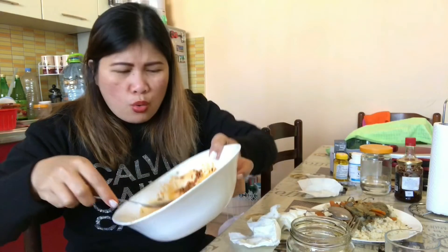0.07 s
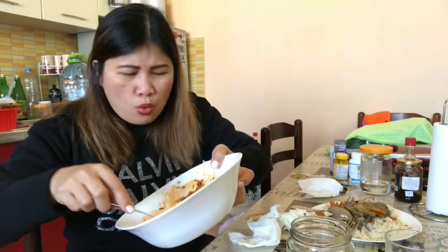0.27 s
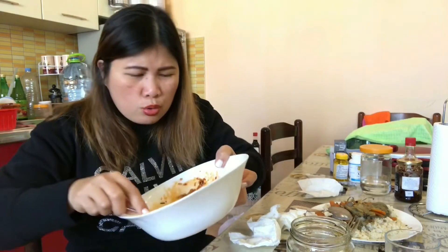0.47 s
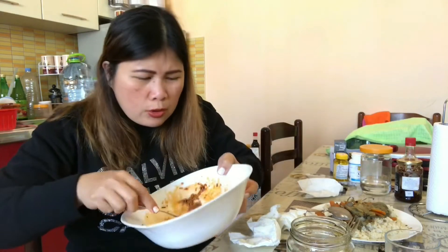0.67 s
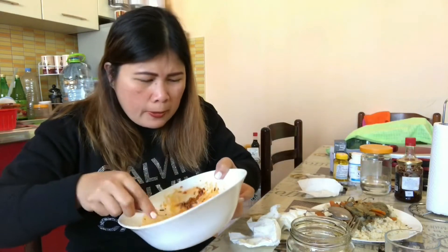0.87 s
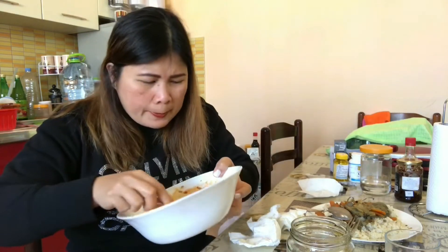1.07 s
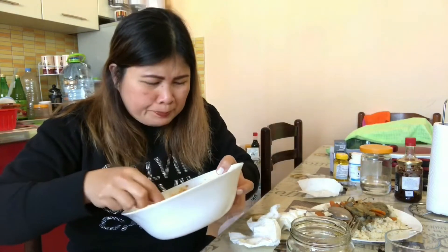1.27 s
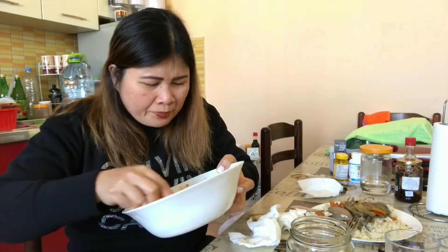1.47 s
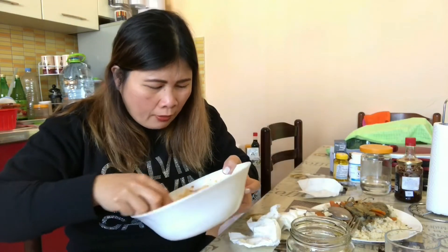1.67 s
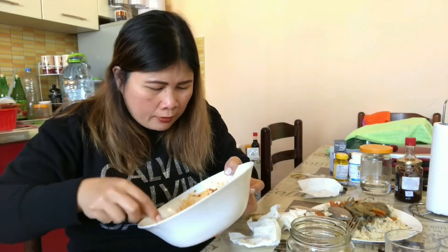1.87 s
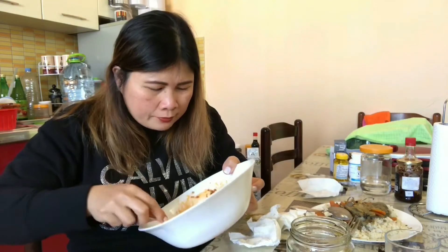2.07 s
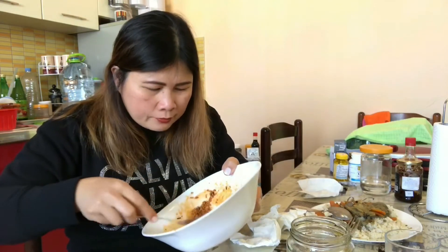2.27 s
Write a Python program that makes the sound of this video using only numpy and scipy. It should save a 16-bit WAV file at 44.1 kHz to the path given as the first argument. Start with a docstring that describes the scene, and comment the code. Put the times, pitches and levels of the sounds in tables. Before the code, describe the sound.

A metal fork lightly taps and scrapes a ceramic bowl through the first second, over a faint, low appliance hum. Around 1 second the bowl bumps the table with a soft swish and a ringing clink. Faint, squeaky scrapes follow until 1.4 seconds. After a lull, the fork strikes the rim loudly at about 2.1 seconds, bounces, and taps once more softly, ringing briefly in the small kitchen.

```python
"""Over a low appliance hum, a metal fork lightly taps and scrapes a hand-held ceramic bowl.
Each tap clicks and sets bowl and fork ringing; in a scrape the tines stick and slip, rasp and squeak.
The bowl bumps the table with a soft swish, then the fork strikes the rim hard and bounces.
The bare walls of the small kitchen make these sounds ring on."""
import sys
import numpy as np
from scipy import signal
from scipy.fft import rfft, irfft, next_fast_len
from scipy.io import wavfile
from scipy.ndimage import uniform_filter1d

SR = 44100
rng = np.random.default_rng(int(sys.argv[2]) if len(sys.argv) > 2 else 0)


def dump_mix(stems):
    """Bounce the given channels to the path in sys.argv[1] as a 16-bit WAV at rate SR."""
    frames = np.atleast_2d(stems).T  # one column per channel
    limited = np.clip(frames, -1, 1)  # hard clip at full scale
    pcm = np.round(limited * 32767).astype(np.int16)
    wavfile.write(sys.argv[1], SR, pcm)


N = 102576

# tones of the appliance hum: pitch_hz, level_db
HUM_TONES = [(48, -65.5), (86, -74), (171.5, -62), (256, -63.5), (290, -70), (382, -72), (559.5, -66.5)]
# tone colour (how strong each pitch is next to the others) of the room air: pitch_hz, level_db
AIR_COLOUR = [(35, -38), (60, -12.5), (94, -7.5), (118, -13), (156, -5), (193, -6), (256, -3.5), (408, -8),
              (553, -9.5), (593, -15.5), (991, -12), (6000, -37), (16000, -46)]
# the tones the bowl rings with: pitch_hz
BOWL_PITCHES = [603, 810, 1202, 1925, 2005, 2930, 4968, 5266, 5897, 6042, 6529, 7412, 7860, 8630, 9812,
                11490, 13405]
# the same tones in order, and their time to fade by 60 dB: ring_s, rim_level_db, inside_level_db
BOWL_TONES = [(0.29, -33, -33.5), (0.028, -30.5, -17), (0.061, -9, -34), (0.072, -14.5, -39),
              (0.17, -16.5, -15.5), (0.13, -5, -4), (0.034, -22, -15.5), (0.032, -2.5, -11),
              (0.086, -10, -10.5), (0.32, -17, -28), (0.059, 3.5, -45), (0.039, -10.5, -55),
              (0.086, -10, -22), (0.059, -11.5, -41), (0.057, -11.5, -45), (0.037, -28, -32),
              (0.053, -23, -41)]
# the tones the fork rings with: pitch_hz, ring_s, level_db
FORK_TONES = [(2290, 0.021, -0.5), (4650, 0.023, -11.5), (6960, 0.089, -4), (7355, 0.049, -1.5),
              (8040, .04, -11), (8760, 0.026, -13.5)]
# fork taps on the bowl: start_s, bowl_db, fork_db, click_db, place (0 inside, 1 rim),
# brightness_db_per_octave, damping_db_per_s (extra fading as the fork rests on the bowl)
TAPS = [(0.0694, -42, -46.5, -42, 0.3, 2.7, 16), (0.2226, -52.5, -58, -50, 0.52, 8.5, 100),
        (0.257, -45, -67, -60, 0.16, -3, 513), (0.8024, -37, -47.5, -36, 0.17, -1, 202),
        (0.848, -46, -73, -58, 0.089, -3, 30), (1.0773, -26, -29, -38, 0.25, -3, 1),
        (1.7744, -71, -76, -63, .3, 12, 100), (1.797, -66, -70, -55, 0.88, 4, 97),
        (2.065, -52.5, -64, -63, 1, 1, 398), (2.0865, -8.5, -25.5, -6, 0.94, 1, 24),
        (2.1612, -15.5, -32, -20.5, 0, 1, 400), (2.298, -40.5, -52, -42, .3, -4.5, 100)]
# tone colour of a tap's click: pitch_hz, level_db
CLICK_COLOUR = [(150, -43), (480, -21), (800, -12), (1050, -15), (1330, 11.5), (1750, -7), (2550, -9),
                (3500, 5.5), (4200, -1.5), (5400, 0), (6800, 0), (8000, -12), (8800, -8), (10300, -17),
                (11500, -12), (13500, -20.5), (16000, -17)]
# fork scrapes: start_s, length_s, rasp_db, bowl_db, squeak_db, fork_db, slips_per_s,
# damping_db_per_s, brightness_db_per_octave
SCRAPE_STROKES = [(.254, 0.049, -61.5, -53.5, -72, -71, 1420, 3000, 10),
                  (0.431, 0.089, -73, -84, -88, -77, 2300, 300, 2),
                  (0.632, 0.054, -56, -56.5, -51.5, -59.5, 1800, 400, 2),
                  (0.81, 0.07, -62.5, -60, -57, -72, 1200, 92, 2),
                  (1.15, 0.125, -60, -63, -59.5, -63, 1200, 100, 0.5),
                  (1.208, 0.061, -50.5, -53, -50, -61, 990, 300, -1),
                  (1.307, 0.071, -55.5, -53, -56.5, -70, 2040, 103, -3),
                  (1.354, 0.037, -53.5, -63, -43, -58.5, 3000, 202, -2.5),
                  (1.595, 0.094, -85, -76, -80, -85, 1800, 104, 0)]
# tone colour of a scrape's rasp: pitch_hz, level_db
RASP_COLOUR = [(600, -18), (1500, 1.5), (1850, -22), (2300, -6), (3400, 5.5), (4000, 5), (5000, 6),
               (6300, -3), (7500, 2), (9500, -12), (11700, -9.5), (13000, -15), (14500, -8), (16000, -25)]
# soft bumps of the bowl on the table: start_s, level_db
TABLE_BUMPS = [(0.862, -45.5), (0.886, -52), (1.0102, -35), (1.022, -44), (1.031, -43.5), (1.078, -41.5)]
# the tones the table rings with: pitch_hz, ring_s, level_db
TABLE_TONES = [(355, 0.027, 1), (1050, 0.04, -8)]
# tone colour of a bump's thud: pitch_hz, level_db
THUD_COLOUR = [(80, -20), (220, -2), (370, 1.5), (680, -10), (1100, 5.5), (1500, -5.5), (2200, -23),
               (6000, -21), (14000, -30)]
# tone colour of the swish: pitch_hz, level_db
SWISH_COLOUR = [(1500, -21), (3000, -5), (4500, -5), (5800, 0), (6800, -3), (8200, -17), (11000, -11.5),
                (13500, -12), (16000, -14)]
# rise and fall of the swish: time_s, level_db
SWISH_SWELL = [(.88, -85), (0.951, -66), (1.006, -51.5), (1.061, -54.5), (1.09, -45), (1.125, -91)]
# single echoes from table and walls: delay_s, level_db
EARLY_ECHOES = [(.0031, -25), (0.0214, -14.5), (.051, -24.5)]
# ringing of the kitchen, from low bands to high: pitch_hz, ring_s, level_db
ROOM_BANDS = [(300, 0.31, -9.5), (1020, 0.32, -9), (2320, 0.45, -6), (5840, 0.49, -9), (11900, 0.37, -11)]

EVENT_SAMPLES = 20480  # room for one tap, scrape or bump


def undb(db):
    """Turn decibels into a volume factor."""
    return 10 ** (np.asarray(db) / 20)


def unit(x):
    """Scale a sound to an average strength (rms) of 1."""
    return x / np.sqrt(np.mean(x ** 2))


def clock(size=EVENT_SAMPLES):
    """The time of each sample in seconds."""
    return np.arange(size) / SR


def fade(ring_s):
    """Die away by 60 dB in ring_s."""
    return np.exp(-np.log(1000) * clock() / ring_s)


def log_hz(size=EVENT_SAMPLES):
    """The pitches of a spectrum on a log scale."""
    return np.log(np.maximum(np.arange(size // 2 + 1) * SR / size, 1))


def colour(x, points):
    """Give a sound a tone colour and a strength of 1."""
    hz, db = np.array(points).T
    gain = undb(np.interp(log_hz(len(x)), np.log(hz), db))
    return unit(irfft(rfft(x) * gain, len(x)))


def noise(points, size=EVENT_SAMPLES):
    """Hiss with a tone colour."""
    return colour(rng.standard_normal(next_fast_len(size)), points)[:size]


def tilt(points, bright_db):
    """Brighten a tone colour by bright_db per octave."""
    return [(hz, db + bright_db * np.log2(hz)) for hz, db in points]


def convolve(x, response):
    """Let every sample of x set off the response."""
    return signal.fftconvolve(x, response)[:len(x)]


def delay(x, start_s):
    """Place a sound in the scene."""
    return np.pad(x, (max(int(start_s * SR), 0), N))[:N]


def drift(rate_hz, size=EVENT_SAMPLES):
    """A smooth random wobble of strength 1."""
    hold = int(SR / rate_hz)
    steps = np.repeat(rng.standard_normal(size // hold + 1), hold)
    return unit(uniform_filter1d(steps, hold)[:size])


def hum_and_air(waver=0.2, air_db=-54.5):
    """An appliance hums, wavering a little, over steady room air."""
    hum = 0
    for hz, db in HUM_TONES:
        level = undb(db) * np.sqrt(2) * (1 + waver * drift(5.74, N))
        hum += level * np.sin(2 * np.pi * hz * clock(N) + waver * drift(4.63, N))
    return hum + undb(air_db) * noise(AIR_COLOUR, N)


def ringing(pitches, ring_times, split=0.0087, twin_db=-19.5):
    """Fading tones, each throbbing against a slightly lower twin, as in an oval bowl."""
    phase = 2 * np.pi * clock()
    tones = []
    for k, (hz, ring_s) in enumerate(zip(pitches, ring_times)):
        pair = np.sin(hz * phase) + undb(twin_db) * np.sin(hz * (1 - split) * phase)
        tones.append((-1) ** k * fade(ring_s) * pair)  # neighbours swing opposite ways
    return np.array(tones) / (1 + undb(twin_db))


def taps(bowl, fork, contact_s=0.00076):
    """Each tap clicks and rings bowl and fork; where it lands decides which bowl tones answer."""
    _, rim_db, inside_db = np.array(BOWL_TONES).T
    octaves = np.log2(np.array(BOWL_PITCHES) / BOWL_PITCHES[np.argmax(inside_db)])
    attack = 1 - np.exp(-(clock() / contact_s) ** 2)
    out = 0
    for start_s, bowl_db, fork_db, click_db, place, bright_db, damping in TAPS:
        levels = undb(bowl_db + place * rim_db + (1 - place) * inside_db + bright_db * octaves)
        ring = (levels @ bowl + undb(fork_db) * fork) * undb(-damping * clock())
        click = noise(tilt(CLICK_COLOUR, bright_db)) * fade(ring_s=0.031)
        out += delay(attack * (ring + undb(click_db) * click / 2), start_s)
    return out


def scrapes(bowl, fork, rise_s=0.013, fall_s=0.027, focus=2.4, spread_db=1.5):
    """The tines stick and slip on the glaze: uneven ticks rasp and ring bowl and fork, with a squeak."""
    rubbed_bowl = undb(focus * np.array(BOWL_TONES)[:, 2]) @ bowl  # rubbing favours the strongest tone
    out = 0
    for stroke in SCRAPE_STROKES:
        start_s, length_s, rasp_db, bowl_db, squeak_db, fork_db, slips_per_s, damping, bright_db = stroke
        directions = rng.choice([-1, 1], EVENT_SAMPLES)
        sizes = undb(spread_db * np.minimum(rng.exponential(size=EVENT_SAMPLES), 3))
        pressure = np.clip(clock() / rise_s, 0, 1) * np.clip((length_s - clock()) / fall_s + .5, 0, 1)
        slips = rng.random(EVENT_SAMPLES) < slips_per_s / SR
        ticks = slips * directions * sizes * pressure
        damped = undb(-damping * clock())
        ring = undb(bowl_db) * unit(convolve(ticks, rubbed_bowl * damped))
        ring += undb(fork_db) * unit(convolve(ticks, fork * damped))
        rub = (ring + undb(rasp_db) * rasp(ticks, bright_db)) * np.sqrt(np.mean(pressure ** 2))
        out += delay(rub + undb(squeak_db) * pressure * squeak(), start_s)
    return out


def rasp(ticks, bright_db, ripple_db=4, step_hz=220):
    """The touching tine gives each scrape's tone colour its own narrow peaks and dips."""
    hz, db = np.array(tilt(RASP_COLOUR, bright_db)).T
    pitches = np.arange(step_hz, SR / 2, step_hz)
    levels = np.interp(np.log(pitches), np.log(hz), db) + ripple_db * rng.standard_normal(len(pitches))
    return colour(ticks, np.column_stack([pitches, levels]))


def squeak(flutter=.22, wander_rad=.85):
    """Rubbing keeps the bowl's strongest inside tone singing, a little unsteadily."""
    hz = BOWL_PITCHES[np.argmax(np.array(BOWL_TONES)[:, 2])]
    level = np.sqrt(2) * (1 + flutter * drift(150))
    return level * np.sin(2 * np.pi * hz * clock() + wander_rad * drift(90))


def bumps():
    """The bowl meets the table with dull thuds that briefly ring the tabletop."""
    table = sum(undb(db) * np.sin(2 * np.pi * hz * clock()) * fade(ring_s)
                for hz, ring_s, db in TABLE_TONES)
    out = 0
    for start_s, db in TABLE_BUMPS:
        thud = noise(THUD_COLOUR) * fade(ring_s=0.029)
        out += delay(undb(db) * (table + thud), start_s)
    return out


def swish():
    """A soft hiss swells and fades as the bowl is lowered."""
    times, db = np.array(SWISH_SWELL).T
    swell = undb(np.interp(clock(N), times, db, left=-np.inf, right=-np.inf))
    return noise(SWISH_COLOUR, N) * swell


def kitchen(x, gap_s=.006, build_s=0.004):
    """Add a few single echoes and a wash of wall echoes that dies away band by band."""
    spectrum = rfft(rng.standard_normal(EVENT_SAMPLES))
    centres = np.log(np.array(ROOM_BANDS)[:, 0])
    build = 1 - np.exp(-clock() / build_s)
    wash = 0
    for share, (_, ring_s, db) in zip(np.eye(len(ROOM_BANDS)), ROOM_BANDS):
        shape = build * fade(ring_s)
        band = irfft(spectrum * np.interp(log_hz(), centres, share))
        wash += undb(db) * band * shape / np.sqrt(np.sum(shape ** 2))
    echoes = sum(undb(db) * delay(x, delay_s) for delay_s, db in EARLY_ECHOES)
    return x + echoes + convolve(x, delay(wash, gap_s))


def scene():
    """Fork and bowl sound in the kitchen, over the hum."""
    bowl = ringing(BOWL_PITCHES, np.array(BOWL_TONES)[:, 0])
    fork_hz, fork_ring_s, fork_db = np.array(FORK_TONES).T
    fork = undb(fork_db) @ ringing(fork_hz, fork_ring_s)
    clatter = taps(bowl, fork) + scrapes(bowl, fork) + bumps() + swish()
    return (kitchen(clatter) + hum_and_air())[None]


def record(dry, low_hz=39.6, top_hz=15900):
    """Cut the deepest bass and the highest treble."""
    dry = signal.sosfilt(signal.butter(4, low_hz, "high", fs=SR, output="sos"), dry)
    return signal.sosfilt(signal.ellip(10, .2, 80, top_hz, fs=SR, output="sos"), dry)


dry = scene()
out = record(dry)
dump_mix(out)
```